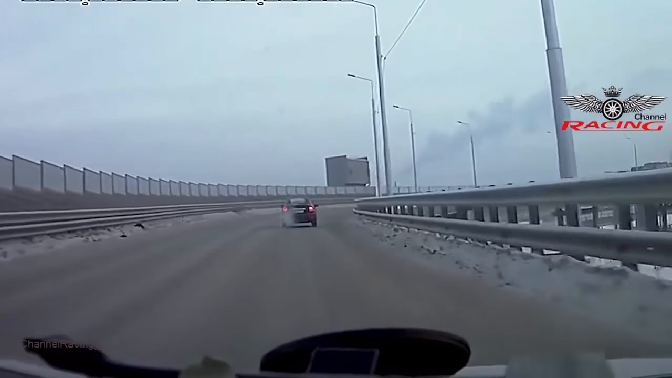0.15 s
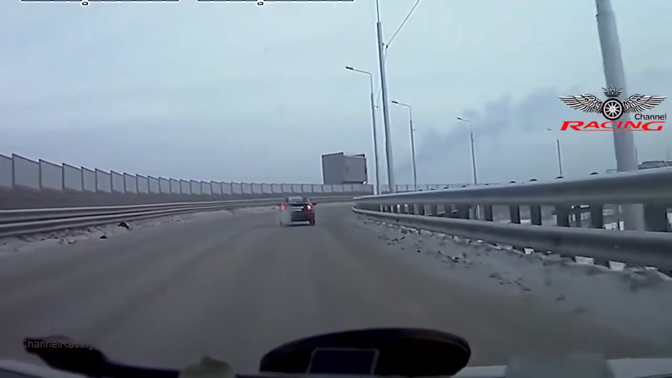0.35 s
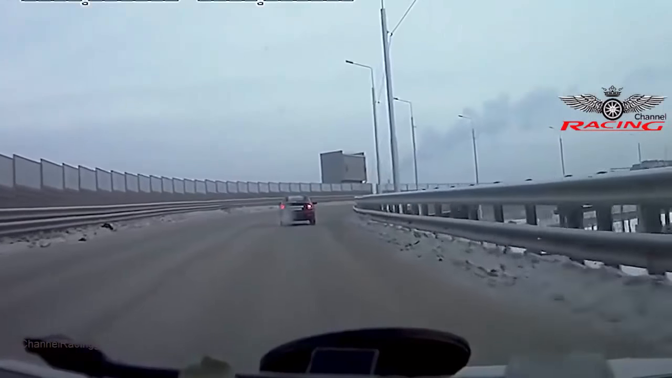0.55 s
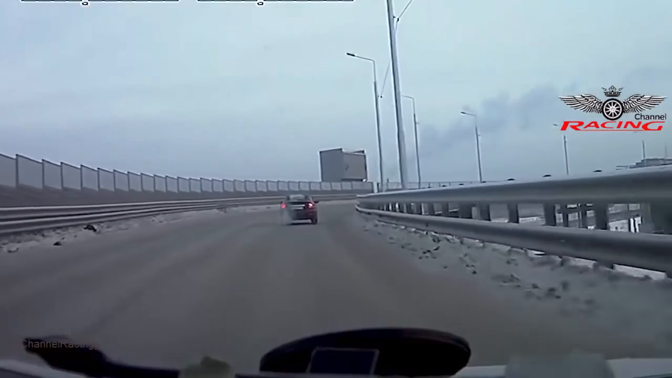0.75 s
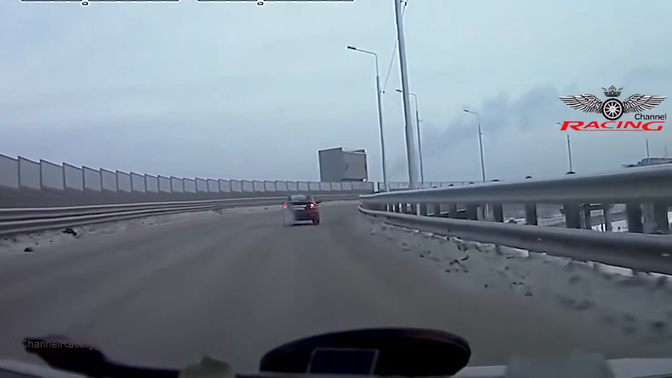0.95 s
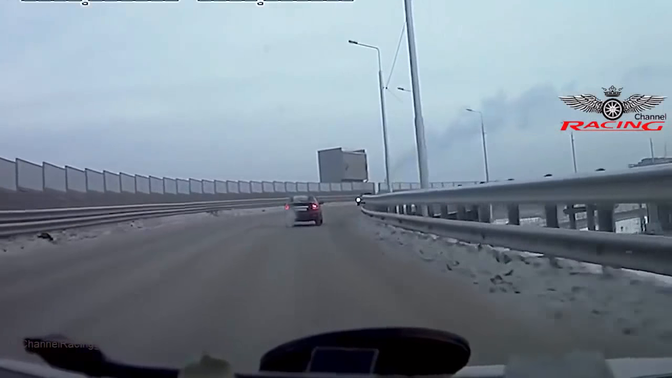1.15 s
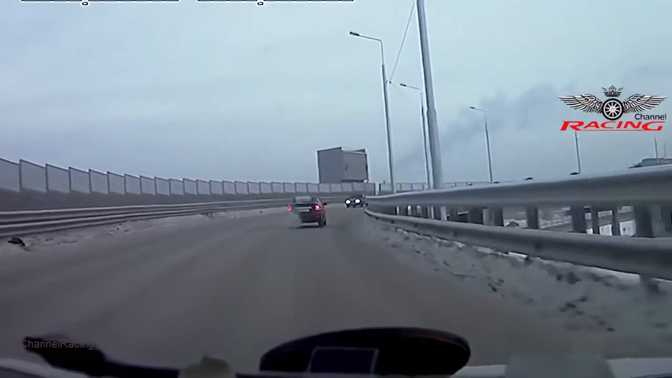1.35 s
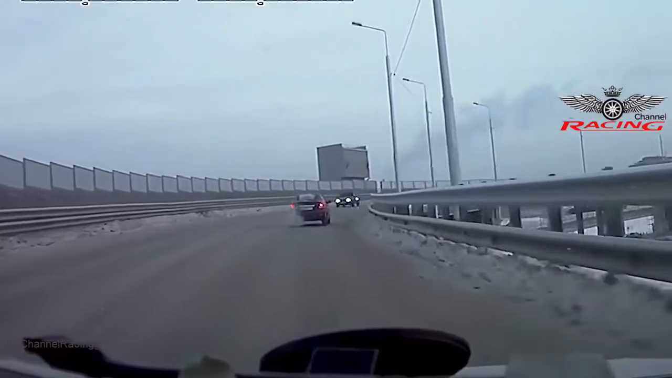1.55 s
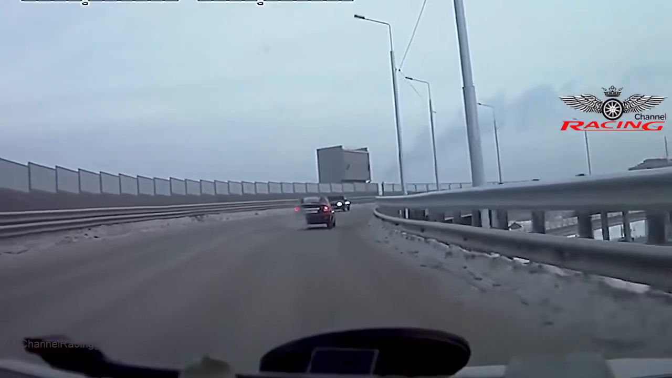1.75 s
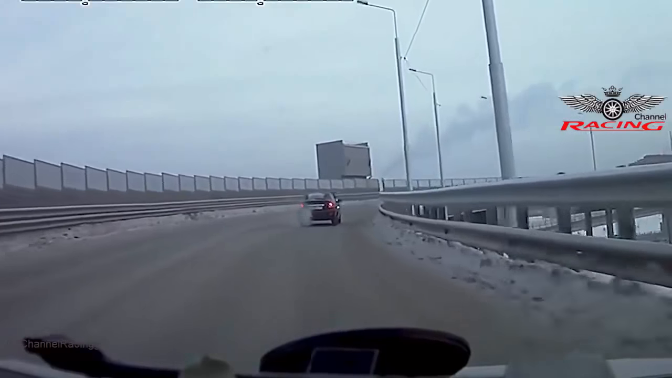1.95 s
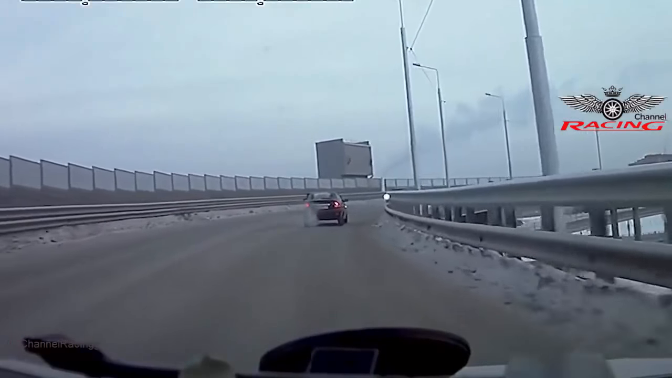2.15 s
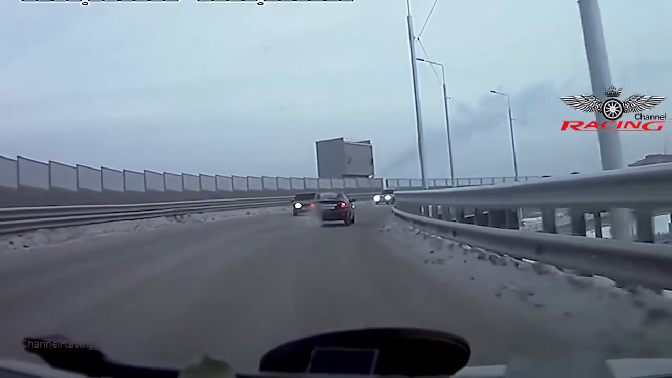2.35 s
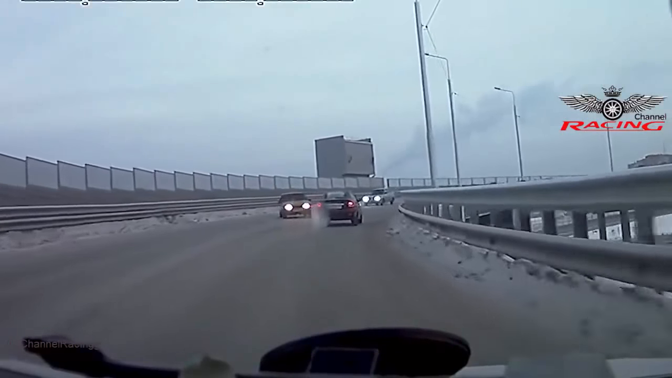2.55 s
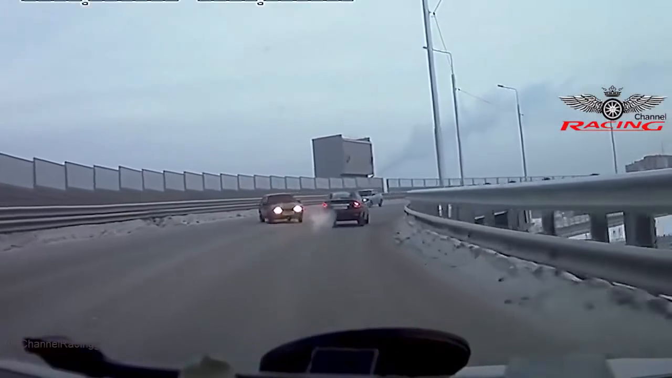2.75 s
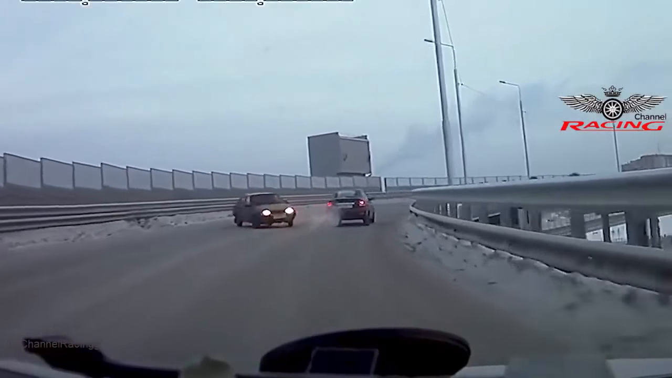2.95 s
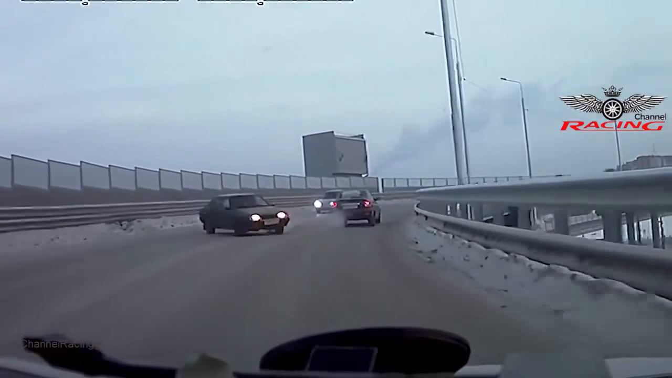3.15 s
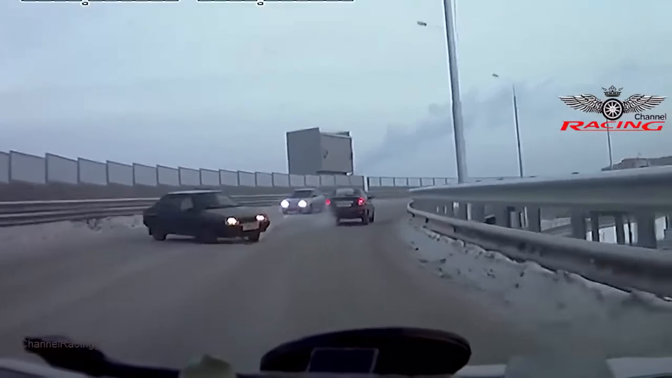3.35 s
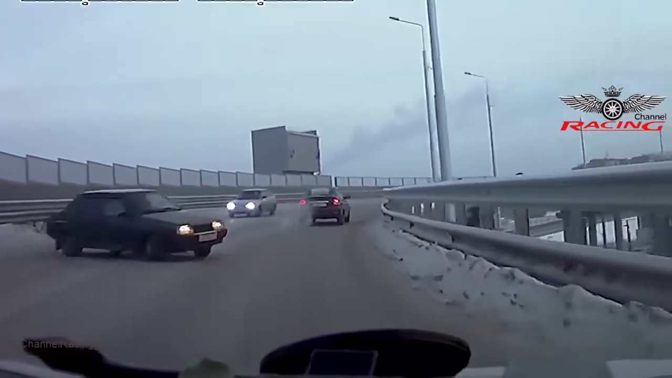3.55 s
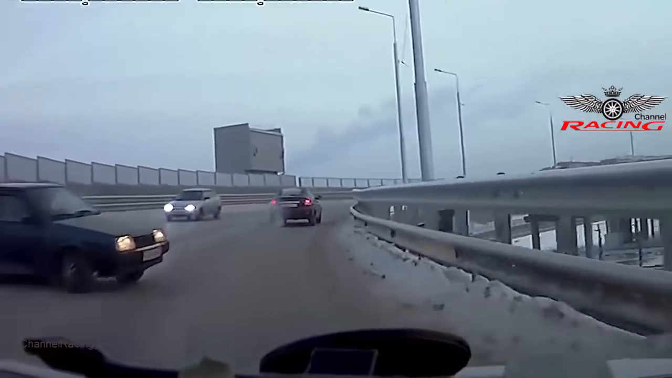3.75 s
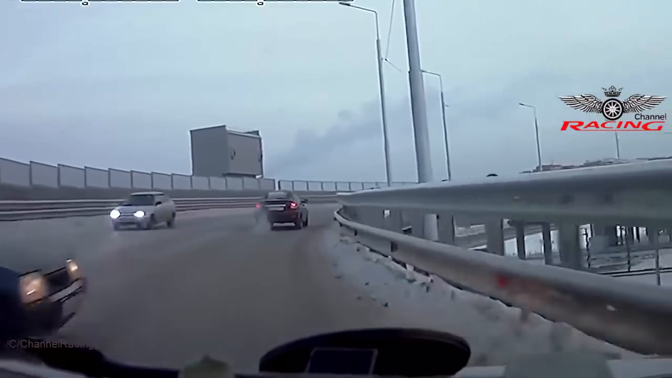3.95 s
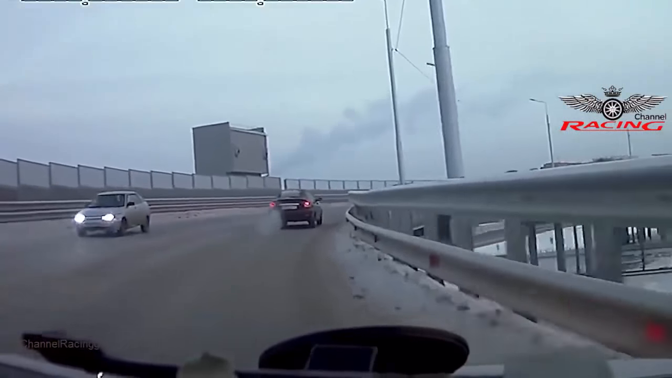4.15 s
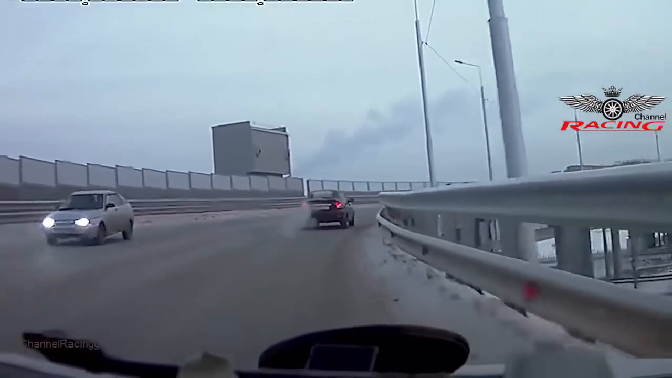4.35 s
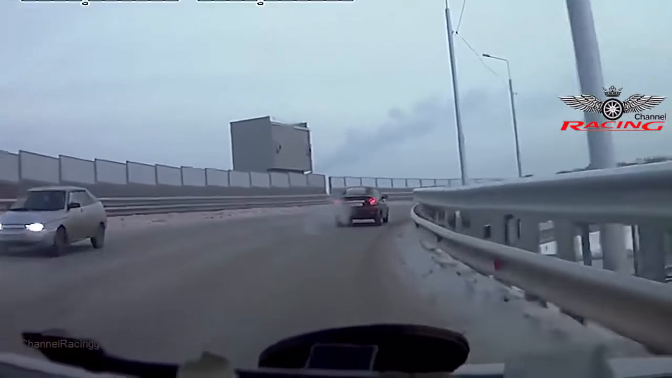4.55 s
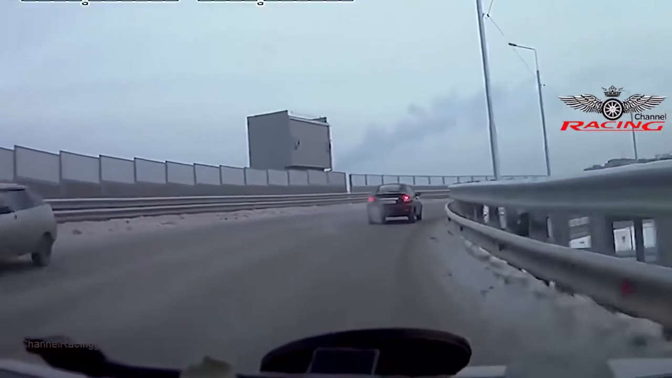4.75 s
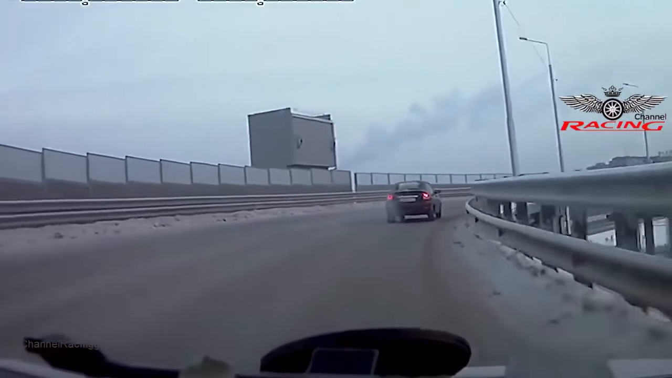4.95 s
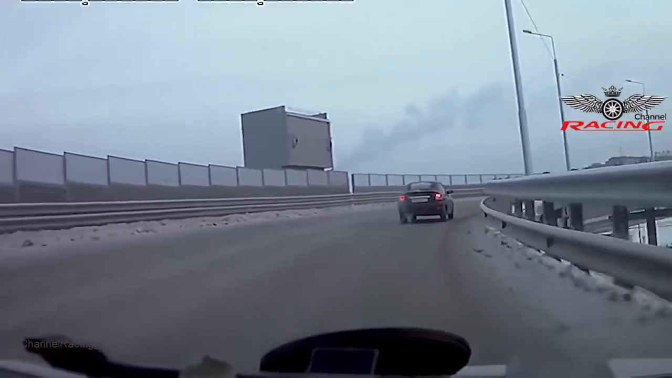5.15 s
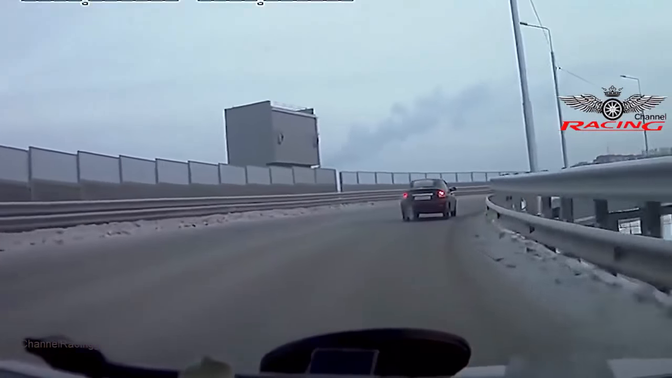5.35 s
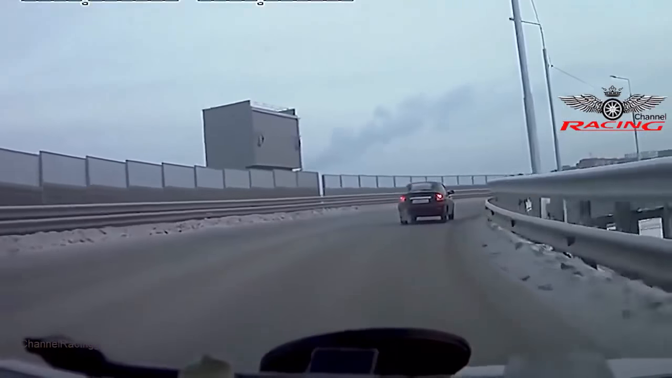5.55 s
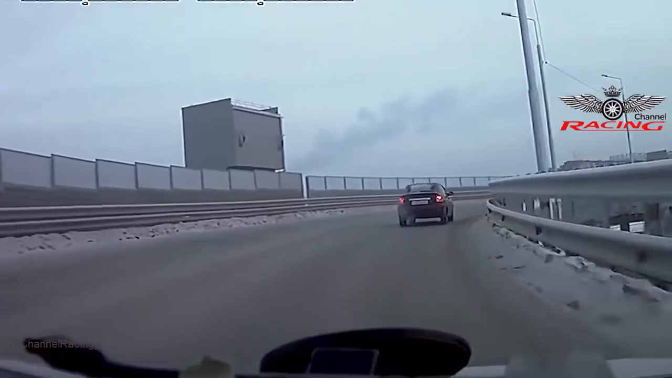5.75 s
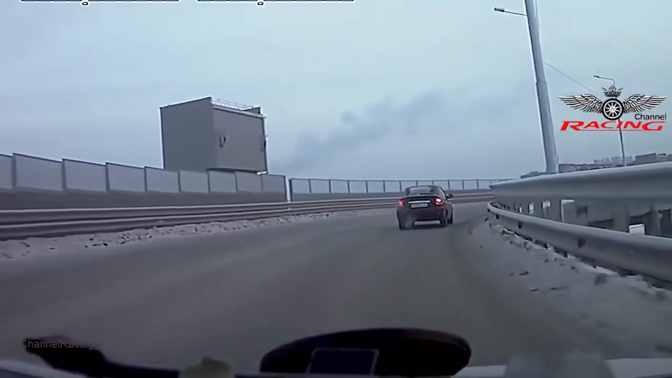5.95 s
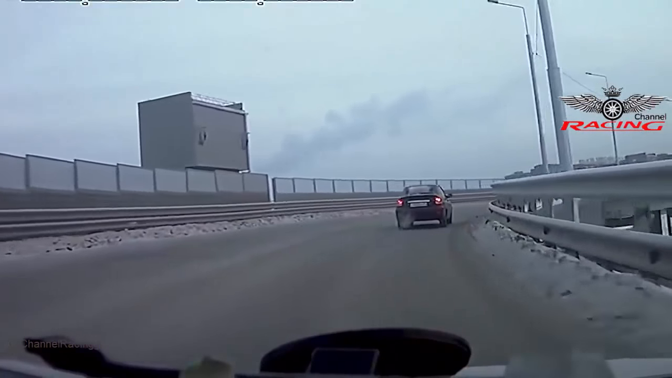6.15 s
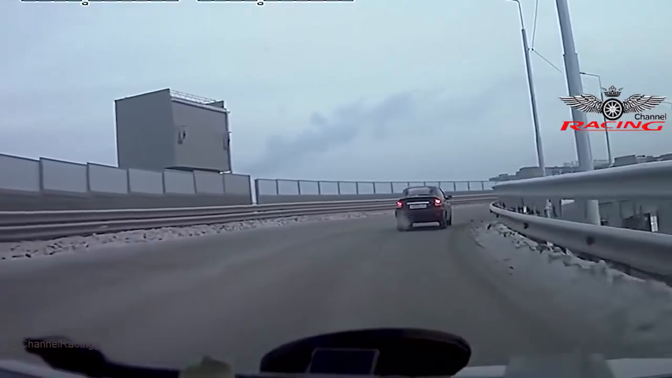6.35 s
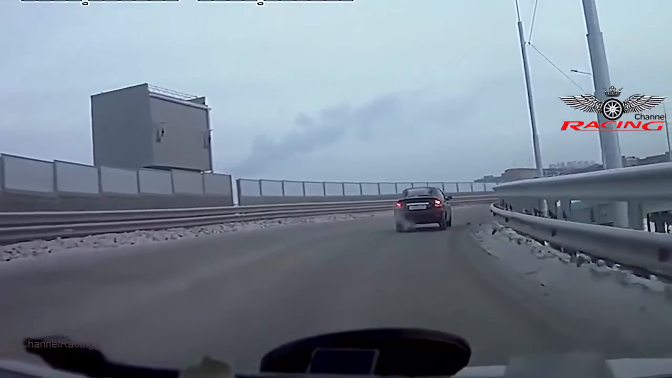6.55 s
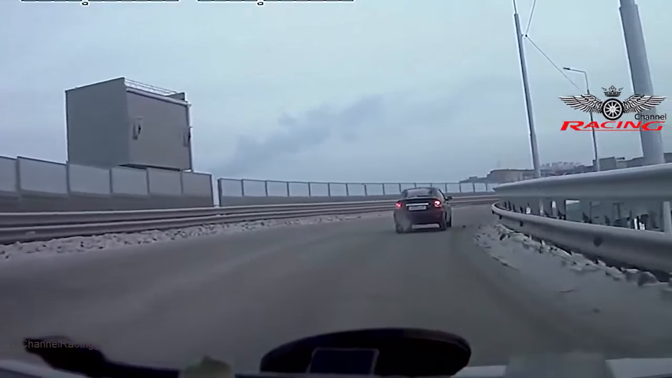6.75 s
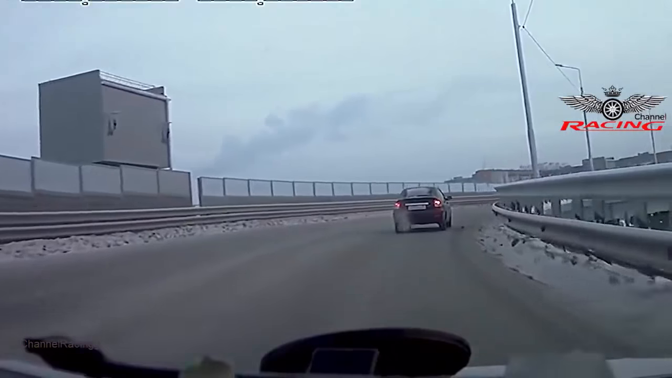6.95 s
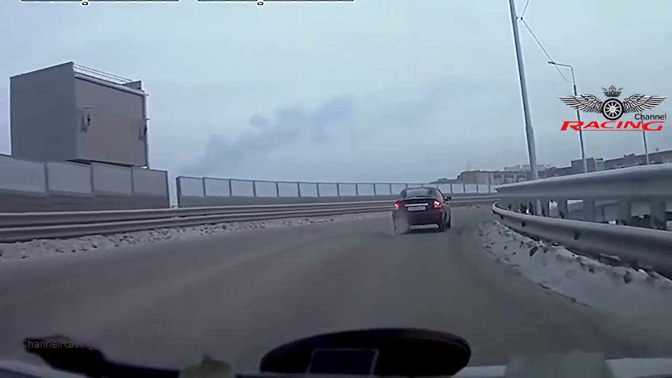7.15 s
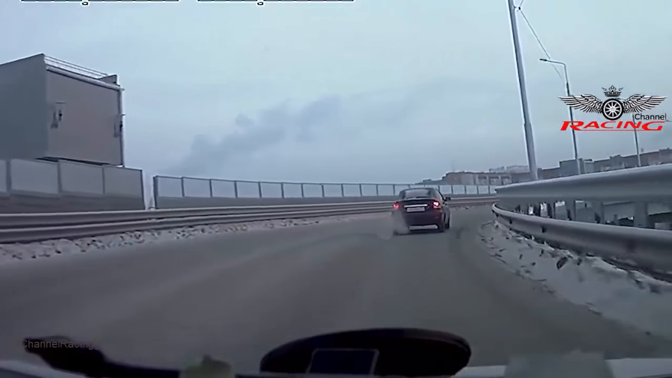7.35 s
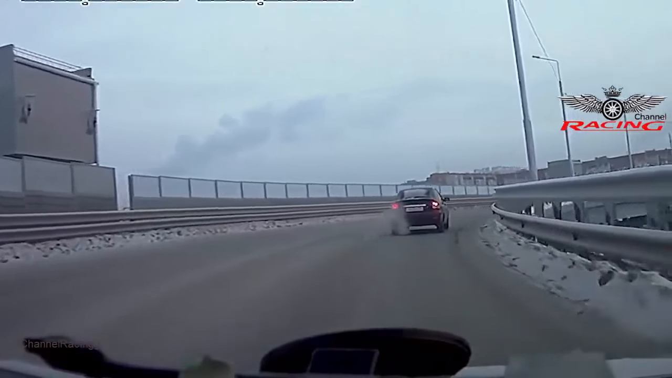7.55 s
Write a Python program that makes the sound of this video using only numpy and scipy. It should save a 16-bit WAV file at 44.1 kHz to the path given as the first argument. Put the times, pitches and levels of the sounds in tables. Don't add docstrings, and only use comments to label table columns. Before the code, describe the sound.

Inside a car cabin on a snowy bridge road, one microphone hears a bass-heavy rumble: low engine hum near 58 Hz, dull tyre roar, muffled air and a very faint high electronic whine. From 0 to 1 s small squeaks, cloth rustle and light ticks sit over soft bumps. Booming jolts come at 1.3-1.6 s, with a dashboard rattle near 1.8 s, then a calmer stretch until 3.3 s. The swerve brings thuds, knocks, rustling and a rapid metallic chatter at 3.5-3.6 s. An oncoming car skids past, its airy hiss and snow spray swelling to about 4.3 s, with short singing tread tones at 4.1-4.8 s amid sharp trim clicks. Heavy booms hit around 5.0 and 5.7 s, with a faint later rush and tiny grit pings. From 6 s the engine is lower and slower, with steady rumble and sparse ticks, fading slightly at 7.5 s.

```python
import sys
import numpy as np
from scipy import signal
from scipy.fft import rfft, irfft, next_fast_len
from scipy.io import wavfile
from scipy.ndimage import uniform_filter1d

SR = 44100
rng = np.random.default_rng(int(sys.argv[2]) if len(sys.argv) > 2 else 0)


def elevation(decibels):
    levels = np.asarray(decibels, float)
    return 10 ** (levels / 20)


def wav_record(signal):
    frames = np.transpose(np.atleast_2d(signal))
    bounded = np.clip(frames, -1, 1)
    quanta = np.round(bounded * 32767).astype(np.int16)
    wavfile.write(sys.argv[1], SR, quanta)


N = 335601

# t/s, firing rate f/Hz, level/dB
ENGINE_RUN = [(0, 57.5, -33), (.5, 58, -28), (1.0, 58, -29), (1.4, 57.5, -36), (1.8, 58, -28),
              (2.3, 57.5, -27), (3.2, 57, -28), (3.6, 56, -25), (4.1, 52, -36), (5.5, 49, -27),
              (6.2, 47.5, -29), (7.61, 45.5, -32)]

# t/s, level/dB
ROUGHNESS = [(0, -2.5), (0.7, -0.5), (1.2, -8), (1.8, -7.5), (2.2, -2), (3.1, -4), (4.05, 1), (4.3, -7),
             (5.0, 3), (5.7, 7), (6.05, 1), (6.7, -1.5), (7.25, -1), (7.61, -11)]
# t/s, body boom level/dB, floor-pan rumble level/dB, length/s
ROAD_BUMPS = [(0.077, -16, -23.5, 0.1), (0.7, -47, -27, 0.21), (1.004, -19, -24.5, 0.05),
              (1.26, -26, -30, 0.21), (1.353, -17, -24, 0.11), (1.582, -13, -21.5, 0.12),
              (3.12, -33.5, -45, 0.84), (3.273, -16.5, -24.5, 0.075), (3.351, -11.5, -20, 0.071),
              (3.526, -18, -19, 0.14), (3.556, -15, -20, 0.28), (3.829, -13, -21.5, 0.092),
              (3.924, -18, -37, 0.11), (4.26, -18, -51, 0.24), (4.353, -42, -24, 0.034),
              (4.464, -14, -37, 0.071), (4.562, -16, -19.5, 0.092), (4.7, -14, -23, 0.24),
              (4.995, -14.5, -41, 0.043), (5.055, -10.5, -34, 0.071), (5.155, -38, -30, .1),
              (5.236, -16, -24, 0.12), (5.474, -37, -21, 0.092), (5.736, -14.5, -32, 0.13),
              (5.818, -39, -24, 0.12), (3.904, -36, -23.5, 0.27), (7.233, -41, -30.5, 0.11),
              (7.532, -34, -36, .08)]
# f/Hz, level/dB per Hz
BOOM_COLOUR = [(8, -34), (14, -4.5), (24, -16), (34, -1.5), (43, 1.5), (55, -2), (72, -6.5), (90, -10.5),
               (120, -27), (200, -120)]
# f/Hz, level/dB per Hz
PAN_COLOUR = [(35, -62), (60, -4.5), (78, 0.5), (100, 2.5), (125, -3), (150, -7.5), (175, -37), (200, -11),
              (260, -24), (440, -120)]
# f/Hz, level/dB per Hz
TYRE_COLOUR = [(88, -20.5), (150, 0), (177, -8.5), (276, -6.5), (350, -13), (397, -14.5), (487, -20),
               (552, -20.5), (800, -29), (1040, -66), (1760, -120)]
# f/Hz, level/dB per Hz
CAVITY_COLOUR = [(110, -27.5), (141, -15), (149, -0.5), (155, -15.5), (185, -37)]
BOOM_DB, PAN_DB, TYRE_DB, CAVITY_DB = -27, -33, -35.5, -39.5
PAN_FOLLOWS = 0.11
TYRE_JOLT_DB = -20
TYRE_SPEED_POWER, AIR_SPEED_POWER = 1.25, 0.63
BUMP_RISE = 0.65
BODY_HZ, BODY_DB = 34.1, -4
BOOM_LIMIT = 0.4

# t/s, tyre hiss level/dB, snow spray level/dB, length/s
PASSING_CARS = [
    (3.395, -50.5, -61, 0.99),
    (3.746, -46, -47, 0.77),
    (4.114, -40.5, -52.5, 0.85),
    (4.315, -38, -50, 0.45),
    (4.552, -44, -76, 0.65),
    (5.382, -53.5, -57.5, 0.8),
]
# f/Hz, level/dB per Hz
AIR_COLOUR = [(350, 2.5), (600, -8.5), (724, 2), (878, -4), (970, 1), (1010, -6.5), (1110, -2.5),
              (1180, -7.5), (1360, -5), (1440, -8), (1670, -11.5), (1720, -20), (1900, -19.5), (2470, -26),
              (4180, -120)]
# f/Hz, level/dB per Hz
PASSING_COLOUR = [(440, -7), (750, -7), (832, -3.5), (1120, -2), (1220, -5.5), (1330, -3), (1640, -13.5),
                  (2350, -26.5), (2600, -26), (2820, -23), (3200, -40), (4160, -50), (7040, -120)]
# f/Hz, level/dB per Hz
SPRAY_COLOUR = [(940, -23), (1600, 2), (2170, -4), (2820, -2), (3130, -5), (4000, -7), (5200, -44),
                (8800, -120)]
AIR_DB, TRAFFIC_DB, SPRAY_DB = -50, -74, -68
PASS_RISE = 0.74
SPRAY_STIR_DB, SPRAY_FOLLOWS = -63, 0.35
SWISH_LOW_HZ, SWISH_HIGH_HZ, SWISH_DB = 1800, 2400, -2.5

# t/s, level/dB
UPPER_WHINE_LEVEL = [(0, -3), (3.3, -2), (3.36, -57), (6.15, -58), (6.25, -5.5), (7.61, -8)]
WHINE_HZ, UPPER_WHINE_HZ, FLIP_HZ = 7867.15, 10021.5, 30.035
WHINE_DB, UPPER_WHINE_DB = -63.5, -73.5
# f/Hz, level/dB per Hz
HISS_COLOUR = [(1940, -40), (3300, -15.5), (7150, -18), (8060, -4.5), (8480, -23), (10300, -16),
               (15000, -67)]
HISS_DB = -73

# t/s, level/dB
STIRRING = [(0, -72), (0.6, -66.5), (1.05, -68.5), (1.3, -66), (1.62, -59.5), (1.82, -62), (2.42, -71),
            (3.22, -70), (3.3, -64), (3.56, -52), (3.88, -60.5), (4.42, -55), (4.7, -61), (5.8, -63.5),
            (6.3, -73), (6.72, -66.5), (7.05, -72.5), (7.61, -70.5)]
# t/s, rustle level/dB, bright part level/dB, length/s
SHAKES = [(0.005, -61, -19, 0.086), (0.106, -57, -12, .05), (0.327, -63, -18, .2), (0.543, -63, -23, 0.21),
          (0.85, -65, -14, 0.16), (1.13, -66, -14, .15), (1.462, -62, -24, .03), (1.575, -73, -7, .1),
          (1.771, -47, -10, 0.037), (2.106, -72, -7, 0.053), (2.316, -58, -16, 0.16),
          (3.36, -49.5, -18, 0.062), (3.485, -50.5, -10, 0.17), (3.618, -48.5, -3, 0.077),
          (3.982, -54.5, -8, 0.13), (4.188, -62, -9, .06), (4.411, -45, -30, 0.067), (4.507, -60, 0, 0.043),
          (4.612, -40.5, -24, 0.028), (4.772, -51.5, -11.5, 0.2), (4.983, -62.5, -7, 0.31),
          (5.34, -60, -13, 0.13), (5.43, -57, -16, .12), (5.568, -55, -21, 0.065), (5.827, -58, -14, 0.063),
          (6.06, -63, -21, 0.14), (6.617, -62, -16, .1), (6.94, -68, -16, .1), (7.332, -59.5, -22, 0.03)]
# f/Hz, level/dB per Hz
CLOTH_COLOUR = [(1880, -6.5), (3200, -4), (5420, -5.5), (5930, -6), (7300, -8), (7990, -10), (10500, -21),
                (13600, -48), (22000, -120)]
# f/Hz, level/dB per Hz
SHEEN_COLOUR = [(5290, -17), (9000, -4.5), (10600, -8), (11900, -8.5), (14200, -15.5), (15500, -20)]
SHEEN_DB, SHAKE_RISE = -14.5, 0.94

# t/s, length/s, f/Hz, level/dB
SQUEAKS = [(0.046, 0.11, 4060, -61), (0.05, 0.049, 4800, -61), (0.147, 0.075, 4770, -72),
           (0.272, 0.04, 4800, -65), (0.298, 0.089, 4910, -67), (0.305, 0.06, 4320, -64),
           (0.353, .03, 4050, -65), (0.293, .06, 2740, -65), (.47, 0.034, 3630, -69),
           (0.465, 0.05, 4870, -70), (.515, 0.063, 4900, -66.5), (0.79, 0.052, 2740, -65),
           (0.632, 0.083, 4780, -66), (0.76, 0.086, 4870, -68), (3.665, 0.056, 6130, -49.5),
           (3.668, .024, 12280, -63), (3.92, 0.08, 11994, -78), (4.016, .1, 11994, -74),
           (4.12, .05, 11994, -76), (5.56, .16, 4800, -68), (5.82, .05, 4820, -68), (5.89, 0.14, 4700, -73),
           (6.028, 0.14, 4770, -70)]
JINGLE_HZ = [2740, 3680, 4220, 5600, 6200, 6760]
JINGLE_DB = -13
CLEAN_DB = -60

# t/s, peak level/dB, f/Hz, high part level/dB, rattling tail level/dB
TRIM_TICKS = [(0.106, -53, 4060, 8, -12), (0.8606, -48, 3700, 7, -11), (1.1109, -49, 5660, -20, -1),
              (1.112, -54, 3900, -20, -2), (1.141, -52, 3880, -2, -2), (1.152, -51, 4000, -12, -3),
              (1.434, -53, 5500, 0, -12), (1.444, -52, 3600, -15, -4), (1.4596, -43, 4090, -6, -6),
              (1.466, -47, 5200, -20, -3), (1.4915, -46, 3490, -12, -4), (1.7325, -48, 5300, -25, -1),
              (3.0205, -57.5, 3500, -55, 16), (3.249, -47, 3460, -20, -4), (3.4371, -52, 3670, 8, -3),
              (3.718, -37, 3670, -12, 0), (3.727, -45, 5430, -3, 2), (4.136, -34.5, 4240, -19, 1),
              (4.234, -38, 3930, -11, 0), (4.348, -44, 3530, 4, -0.5), (4.3735, -36, 3680, -10, -3),
              (4.43, -43, 6650, -12, -9), (4.461, -37.5, 4230, -15, -4), (4.535, -44, 4100, -10, -9),
              (4.607, -35, 4230, -3.5, -6.5), (4.65, -37.5, 5030, -20, -1), (5.1416, -44, 3970, -20, 5),
              (6.603, -47, 3300, -1, -9), (6.64, -55, 5200, -20, -6), (6.692, -46, 5950, -25, 1),
              (6.7491, -50.5, 3280, -6, -1), (6.8735, -52, 3830, -4, -3), (6.94, -56, 3500, 0, -7),
              (7.278, -50, 3700, -14, -3), (7.3256, -49, 5550, -15, 0), (7.337, -46, 3500, -7, -6)]
TRIM_HIGH_HZ, TRIM_T60_S = 5340, 0.055
# t/s, peak level/dB, f/Hz, high part level/dB, rattling tail level/dB
DASH_TICKS = [(0.2743, -52, 2950, -4, -4), (1.381, -47, 3600, -8, -9), (1.757, -39.5, 4320, 1, -6),
              (1.77, -36.5, 2930, -0.5, -6), (1.7938, -36, 2740, -14, -7), (1.8345, -41.5, 3250, -5, -5),
              (1.962, -42, 2840, -12, -9), (3.3024, -51, 2750, -1, 2), (3.3593, -35.5, 2800, -12, -3.5),
              (3.5704, -54.5, 3100, 5, -8), (3.6254, -43, 2960, 9, 2.5), (3.398, -37.5, 1530, -12, -8),
              (3.399, -42, 3700, -6, -8), (3.7945, -45, 2740, -2, -5), (3.918, -43.5, 2660, -3, 0.5),
              (4.1195, -38, 2800, -4, -4), (4.179, -39.5, 2740, 4, -5), (4.4058, -33, 2840, -11, 0.5),
              (4.595, -35, 3150, -16, 0), (5.4171, -39.5, 2520, -15, -0.5), (5.5534, -43, 2900, -8, -2),
              (5.8247, -47, 2920, -3, -3)]
DASH_HIGH_HZ, DASH_T60_S = 5800, 0.071

# t/s, peak level/dB, f/Hz, time to fade 60 dB/s
KNOCKS = [(0.253, -19.5, 244, 0.044), (2.468, -31, 600, .02), (4.061, -25, 530, 0.046),
          (3.334, -25, 326, 0.059), (3.359, -19, 260, 0.054), (3.507, -21, 372, 0.046),
          (3.3, -22.5, 200, 0.038), (3.57, -26, 376, .04), (3.626, -14, 316, 0.064),
          (3.63, -13.5, 159, 0.083), (3.63, -26.5, 600, 0.055), (4.04, -21, 215, 0.042),
          (3.747, -35, 218, 0.049), (3.824, -18.5, 254, 0.068), (3.901, -16.5, 199, 0.086),
          (3.93, -22.5, 247, 0.11), (4.117, -16, 419, 0.041), (4.118, -12, 288, 0.025),
          (4.12, -21, 890, 0.024), (4.752, -27, 230, .05), (5.147, -26, 205, 0.049),
          (5.669, -40, 294, 0.041)]

# t/s, peak level/dB
GRIT = [(0.6394, -57), (1.5374, -54), (2.1041, -54), (3.427, -51), (3.4699, -46), (3.7034, -53),
        (3.8371, -48), (3.9429, -51), (4.2417, -51), (4.4971, -42), (4.5325, -47), (4.6922, -54),
        (5.3231, -57), (5.4253, -53), (5.4403, -48), (5.4867, -53), (5.5455, -53), (5.57, -56),
        (5.595, -56), (5.6628, -58), (5.7187, -55), (5.7461, -50), (5.774, -51), (5.8329, -56),
        (5.845, -54), (5.861, -56)]
GRIT_HZ, GRIT_HIGH_HZ, GRIT_HIGH_DB, GRIT_T60_S = 9400, 11000, -9, 0.022

# t/s, length/s, f/Hz, level/dB
JOINTS = [
    (1.275, .16, 32, -15),
    (1.5, .16, 34, -15),
]

# t/s, peak level/dB
CHATTER = [(3.342, -44), (3.514, -32), (3.518, -31), (3.521, -31), (3.537, -36), (3.547, -42), (3.562, -44),
           (3.572, -36), (3.592, -31), (3.6, -29), (3.603, -26), (3.608, -32), (3.6115, -32), (3.614, -34),
           (3.617, -34), (3.62, -26), (3.625, -39), (3.631, -34)]
CHATTER_HZ, CHATTER_HIGH_HZ, CHATTER_HIGH_DB, CHATTER_T60_S = 6000, 10800, -13, 0.025

# t/s, length/s, f/Hz, level/dB
TREAD = [
    (4.0, .14, 1260, -56),
    (4.141, 0.21, 2360, -50.5),
    (4.153, 0.18, 2770, -57),
    (4.22, 0.094, 1125, -42),
    (4.279, .09, 1003, -41.5),
    (4.301, .15, 1306, -40.5),
    (4.421, .14, 883, -47.5),
    (4.43, 0.35, 1314, -53),
    (4.737, 0.055, 1060, -50),
    (5.238, 0.13, 2420, -58),
]
TREAD_WIDTH = 0.041

# t/s, length/s, difference level/dB
OVERLOADS = [(1.342, 0.045, -24), (1.551, 0.074, -3.5), (1.74, 0.031, -31), (3.33, 0.056, -10),
             (3.506, 0.12, -6.5), (3.806, 0.057, -7), (4.154, 0.033, -30), (4.672, 0.085, -12),
             (4.978, 0.025, -10), (5.04, 0.039, -3), (5.716, 0.056, -4.5)]
OFFSET = 0.0125
CUTOFF_HZ = 15900
FADE_FROM_S, FADE_DB = 7.41, -5


def rms_one(x):
    return x / np.sqrt(np.mean(x ** 2) + 1e-20)


def in_time(rows):
    s, *columns = np.transpose(rows)
    return [np.interp(np.arange(N) / SR, s, c) for c in columns]


def coloured(spectrum):
    hz, db = np.transpose(spectrum)
    size = next_fast_len(N)
    log_hz = np.log(np.maximum(np.arange(size // 2 + 1) * SR / size, 1))
    shape = elevation(np.interp(log_hz, np.log(hz), db, left=-90, right=-90))
    return rms_one(irfft(rfft(rng.standard_normal(size)) * shape, size)[:N])


def drift(rate):
    r = np.exp(-80 * np.pi * rate / SR)
    slow = signal.lfilter([1], [1, -2 * r, r * r], rng.standard_normal(N // 40 + 2002))[2000:]
    return np.interp(np.arange(N) / 40, np.arange(len(slow)), rms_one(slow))


def evened(x, span_s, share):
    level = np.sqrt(uniform_filter1d(x ** 2, int(span_s * SR)) + 1e-3)
    return rms_one(x / level ** np.clip(share, 0, 1))


def band(x, low_hz, high_hz):
    y = signal.sosfilt(signal.butter(2, [low_hz, high_hz], "band", fs=SR, output="sos"), x)
    return y / np.abs(y).max()


def humps(times, peaks_db, lengths, rise, floor_db, sharp):
    t = np.arange(0, N / SR, 0.002)
    away = (t - times[:, None]) / np.maximum(lengths, 0.005)[:, None]
    away = np.where(away < 0, -away / max(rise, 0.05), away)
    power = np.sum(elevation(peaks_db[:, None] - 20 * away ** sharp) ** 2, axis=0)
    return 10 * np.log10(np.interp(np.arange(N) / SR, t, power) + elevation(floor_db) ** 2)


def add(out, s, piece):
    i = int(s * SR)
    out[i:i + len(piece)] += piece[:N - i]


def speed_db():
    hz, _ = in_time(ENGINE_RUN)
    return 20 * np.log10(hz / hz[0])


def engine():
    hz, db = in_time(ENGINE_RUN)
    phase = 2 * np.pi * np.cumsum(hz) / SR
    level = np.sqrt(2) * elevation(db + drift(2.6))
    return level * np.sin(phase + 0.35 * drift(1.8))


def road():
    rough_db, = in_time(ROUGHNESS)
    s, boom_peak_db, pan_peak_db, length = np.transpose(ROAD_BUMPS)
    boom_db = humps(s, boom_peak_db, length, BUMP_RISE, BOOM_DB + rough_db, sharp=1.36)
    pan_db = humps(s, pan_peak_db, 1.82 * length, BUMP_RISE, PAN_DB + PAN_FOLLOWS * rough_db, sharp=0.99)

    skid = (s > PASSING_CARS[0][0] - 0.1) & (s < PASSING_CARS[2][0])
    jolt_db = np.maximum(boom_peak_db, pan_peak_db + 0.5) + TYRE_JOLT_DB + np.where(skid, 3.0, -2.5)
    rolling_db = TYRE_DB + TYRE_SPEED_POWER * speed_db()
    tyre_db = humps(s, jolt_db, 1.8 * length, BUMP_RISE, rolling_db, sharp=1.31)

    body = np.sqrt(2) * np.sin(2 * np.pi * BODY_HZ * np.arange(N) / SR + 1.11 * drift(2.43))
    boom_noise = evened(coloured(BOOM_COLOUR), span_s=0.028, share=0.5)
    boom = elevation(boom_db - 1.0) * (boom_noise + elevation(BODY_DB) * body)
    pan = elevation(pan_db) * evened(coloured(PAN_COLOUR), span_s=0.03, share=0.2)
    drone = elevation(CAVITY_DB) * evened(coloured(CAVITY_COLOUR), span_s=0.06, share=0.7)
    return boom + pan + drone + elevation(tyre_db) * coloured(TYRE_COLOUR)


def air():
    slowing_db = AIR_SPEED_POWER * speed_db()
    s, hiss_db, spray_peak_db, length = np.transpose(PASSING_CARS)
    stirred_db = SPRAY_STIR_DB + SPRAY_FOLLOWS * (in_time(STIRRING)[0] + 65)
    own_db = 10 * np.log10(elevation(SPRAY_DB + slowing_db) ** 2 + elevation(stirred_db) ** 2)

    passing_db = humps(s, hiss_db, length, PASS_RISE, TRAFFIC_DB, sharp=1.0) + 0.99 * drift(40.0)
    passing = elevation(passing_db) * coloured(PASSING_COLOUR)
    spray_db = humps(s, spray_peak_db, length, PASS_RISE, own_db, sharp=0.74) + 1.47 * drift(23)
    spray = elevation(spray_db) * coloured(SPRAY_COLOUR)

    swish_peak_db = spray_peak_db[2:] + SWISH_DB
    swish_db = humps(s[2:], swish_peak_db, 0.6 * length[2:], PASS_RISE, -94, sharp=2.9) + 2.6 * drift(17.0)
    hollow = rms_one(band(rng.standard_normal(N), SWISH_LOW_HZ, SWISH_HIGH_HZ))
    return elevation(AIR_DB + slowing_db) * coloured(AIR_COLOUR) + passing + spray + elevation(swish_db) * hollow


def whine():
    t = np.arange(N) / SR
    flip = np.sin(2 * np.pi * FLIP_HZ * t + 1.12)
    steady = rms_one(np.tanh(11.0 * flip) * np.sin(2 * np.pi * WHINE_HZ * t))
    bursts = rms_one(flip ** 5 * np.sin(2 * np.pi * UPPER_WHINE_HZ * t))
    upper_db = UPPER_WHINE_DB + in_time(UPPER_WHINE_LEVEL)[0]
    return elevation(WHINE_DB) * steady + elevation(upper_db) * bursts


def hiss():
    return elevation(HISS_DB) * coloured(HISS_COLOUR)


def rustle():
    stir_db, = in_time(STIRRING)
    s, db, sheen_db, length = np.transpose(SHAKES)
    dull_db = humps(s, db, length, SHAKE_RISE, stir_db, sharp=0.9)
    bright_db = humps(s, db + sheen_db, 0.57 * length, SHAKE_RISE, stir_db + SHEEN_DB, sharp=2.0)
    flicker_db = 1.36 * drift(60.0)
    dull = elevation(dull_db + 1.5 + flicker_db) * coloured(CLOTH_COLOUR)
    bright = elevation(bright_db + 4.0 + 0.96 * flicker_db) * coloured(SHEEN_COLOUR)
    return dull + bright


def squeaks():
    out, shake, wobble = np.zeros(N), drift(40.0), drift(75.0)
    chances = rng.normal(0, 1, (len(SQUEAKS), len(JINGLE_HZ)))
    for (s, length, hz, db), chance in zip(SQUEAKS, chances):
        t = np.arange(int(length * SR)) / SR
        start = int(s * SR)
        local, turn = shake[start:][:len(t)], wobble[start:][:len(t)]
        rough = np.clip((CLEAN_DB - db) / 12, 0.25, 0.7) if hz < 5200 else 0.25
        tone = elevation(5 * rough * local) * np.sin(2 * np.pi * hz * t + 4 * rough ** 2 * turn)
        jingle = np.sin(2 * np.pi * np.outer(JINGLE_HZ, t) + 0.4 * np.outer(chance, turn))
        others = elevation(JINGLE_DB + 4 * chance) @ jingle
        jingles_now = (4700 < hz < 4950) * (s < 1)
        along = rough * elevation(-3.0 * local) * others * jingles_now
        add(out, s, elevation(db + 5.0) * np.hanning(len(t)) ** 0.39 * (tone + along))
    return out


def ticks(rows, high_hz, t60):
    out, t = np.zeros(N), np.arange(2200) / SR
    bursts = rng.standard_normal((len(rows), 3, len(t))) * elevation(-60 * t / max(t60, 0.004))
    contact = 1.0 * (t == 0)
    for (s, db, low_hz, high_db, tail_db), burst in zip(rows, bursts):
        edges = [(low_hz * 0.9, low_hz * 1.118), (high_hz * 0.77, high_hz * 1.29), (2500, 14000)]
        low, high, crack = [band(contact, *e) + elevation(tail_db) * band(b, *e) for e, b in zip(edges, burst)]
        add(out, s, elevation(db) * (low + elevation(high_db + 5.5) * (high + 0.44 * crack)))
    return out


def trim_ticks():
    return ticks(TRIM_TICKS, TRIM_HIGH_HZ, TRIM_T60_S)


def knocks():
    out, t = np.zeros(N), np.arange(6000) / SR
    for s, db, hz, t60 in KNOCKS:
        ring = np.sin(2 * np.pi * hz * t) + 0.12 * np.sin(2 * np.pi * 2.78 * hz * t)
        onset = np.minimum(t / 0.003, 1)
        add(out, s, elevation(db - 60 * t / max(t60, 0.01)) * ring * onset)
    return out


def dash_ticks():
    return ticks(DASH_TICKS, DASH_HIGH_HZ, DASH_T60_S)


def grit():
    rows = [(s, db, GRIT_HZ, GRIT_HIGH_DB, -8.0) for s, db in GRIT]
    return ticks(rows, GRIT_HIGH_HZ, GRIT_T60_S)


def joints():
    out = np.zeros(N)
    for s, length, hz, db in JOINTS:
        t = np.arange(int(length * SR)) / SR
        add(out, s, elevation(db + 3.5) * np.hanning(len(t)) * np.sin(2 * np.pi * hz * t))
    return out


def chatter():
    rows = [(s, db, CHATTER_HZ, CHATTER_HIGH_DB, -8.0) for s, db in CHATTER]
    return ticks(rows, CHATTER_HIGH_HZ, CHATTER_T60_S)


def tread():
    out, noise = np.zeros(N), rng.standard_normal((len(TREAD), SR // 2))
    for (s, length, hz, db), white in zip(TREAD, noise):
        narrow = rms_one(band(white, hz * (1 - TREAD_WIDTH), hz * (1 + TREAD_WIDTH)))
        sung = evened(narrow, span_s=0.016, share=0.7)[-int(length * SR):]
        add(out, s, elevation(db) * np.hanning(len(sung)) ** 0.5 * sung)
    return out


def scene():
    deep = BOOM_LIMIT * np.tanh((road() + joints()) / BOOM_LIMIT)
    smooth = engine() + air() + tread() + whine() + hiss()
    loose = rustle() + squeaks() + trim_ticks() + knocks() + dash_ticks() + grit() + chatter()
    fade_db = np.interp(np.arange(N) / SR, [FADE_FROM_S, N / SR], [0, FADE_DB])
    mono = (deep + smooth + loose) * elevation(fade_db)
    return np.array([mono, mono])


def thinned(x, from_hz, floor_db):
    hz, _, cells = signal.stft(x, SR, nperseg=1024)
    limit = elevation(floor_db + 2.0 * np.maximum(hz - from_hz, 0) / 1000)[:, None]
    keep = (np.abs(cells) > limit) | (hz < from_hz)[:, None]
    top_db = 10 * np.log10(np.mean(np.abs(cells[hz > from_hz]) ** 2, axis=0) + 1e-20)
    chance = np.repeat(rng.standard_normal(cells.shape[1] // 3 + 1), 3)[:cells.shape[1]]
    edge_hz = 15000 + 85 * (uniform_filter1d(top_db, 3) + 95) + 350 * chance
    top_hz = 650 * np.round(edge_hz / 650)
    return signal.istft(cells * keep * (hz[:, None] < top_hz), SR, nperseg=1024)[1][:N]


def top_cut(x):
    return signal.sosfilt(signal.butter(12, 15690, fs=SR, output="sos"), x)


def record(dry):
    mono = dry[0]
    limited = mono / (1 + (mono / 0.352) ** 12) ** (1 / 12)
    rounded = thinned(limited, from_hz=10500, floor_db=-114)
    overload = np.zeros(N)
    for s, length, db in OVERLOADS:
        add(overload, s, elevation(db) * np.hanning(int(length * SR)) ** 0.5)
    upper = signal.sosfilt(signal.butter(2, 900, "high", fs=SR, output="sos"), rounded)
    hum = signal.sosfilt(signal.butter(3, 110, "low", fs=SR, output="sos"), rng.standard_normal(N))
    unlike = overload * drift(300.0) * (upper + 0.058 * rounded) + elevation(-72.0) * rms_one(hum) + OFFSET
    stereo = rounded + unlike * [[1], [-1]]
    mix = signal.sosfilt(signal.cheby2(12, 70, CUTOFF_HZ, fs=SR, output="sos"), stereo)
    return top_cut(mix)


dry = scene()
out = record(dry)
wav_record(out)
```